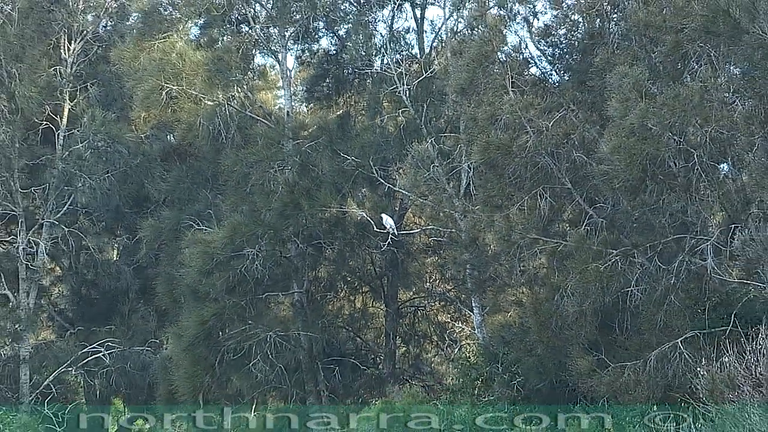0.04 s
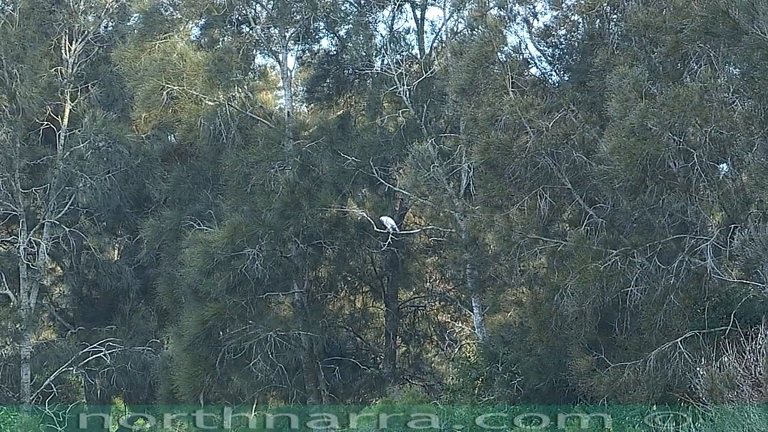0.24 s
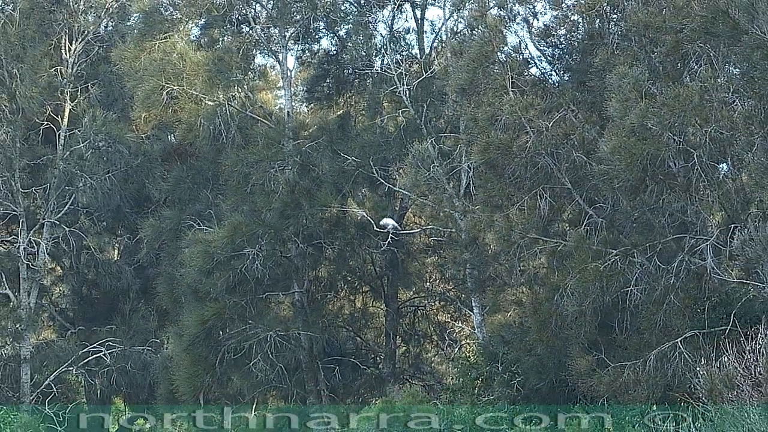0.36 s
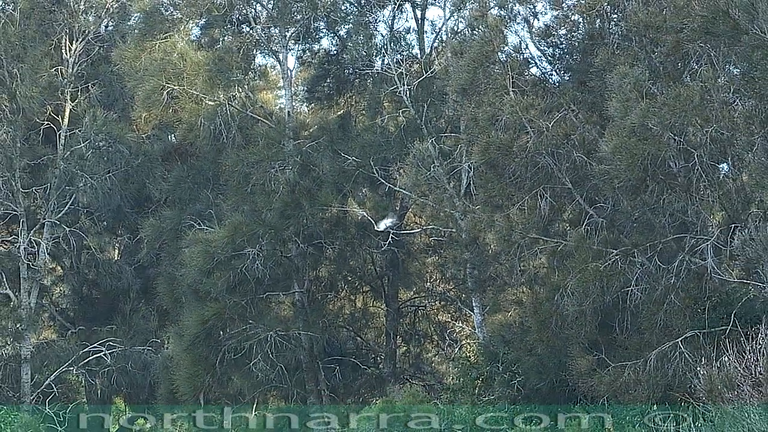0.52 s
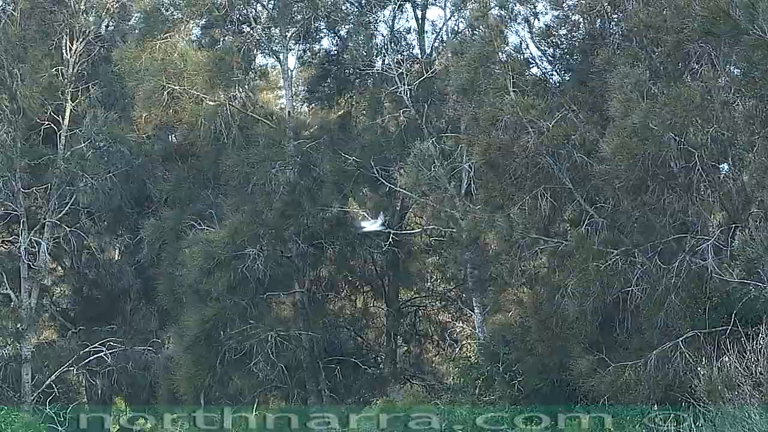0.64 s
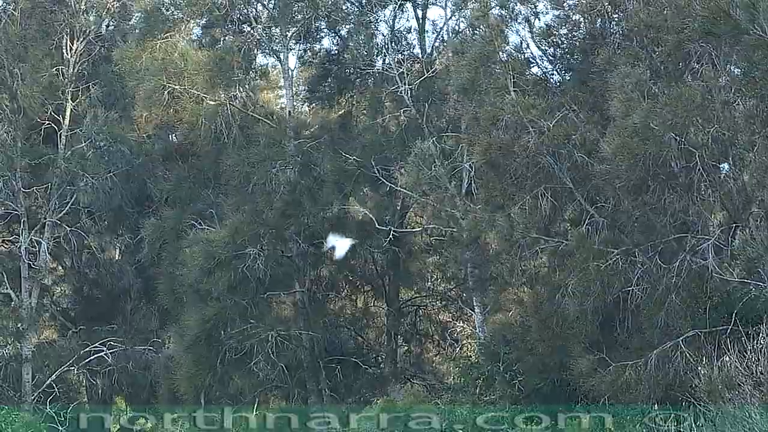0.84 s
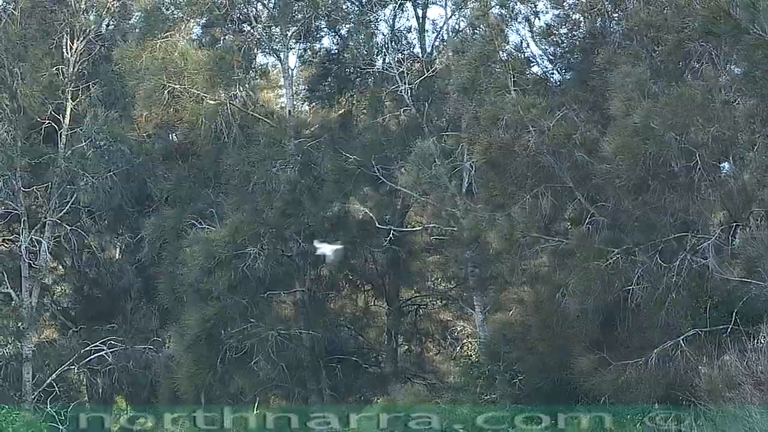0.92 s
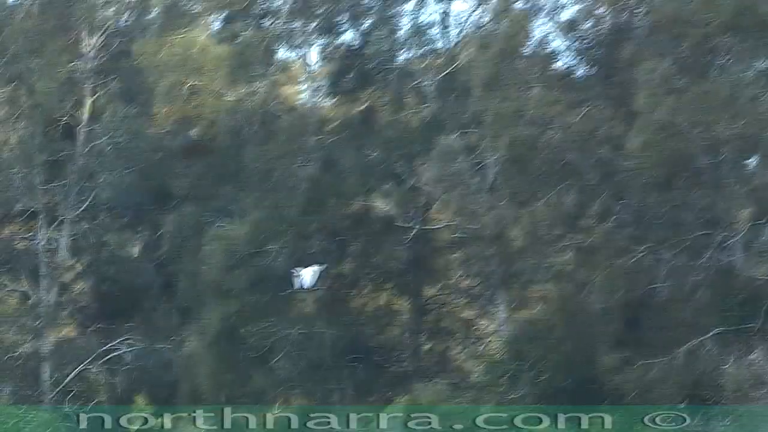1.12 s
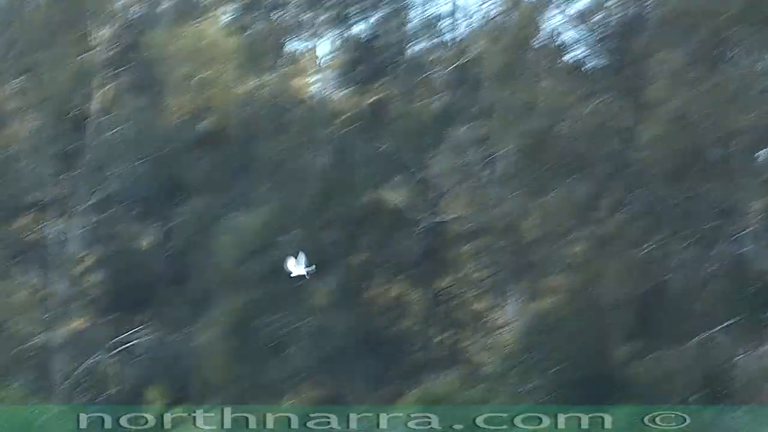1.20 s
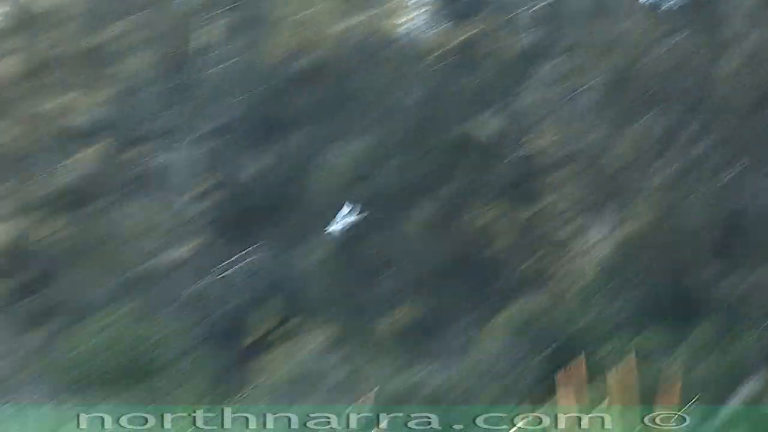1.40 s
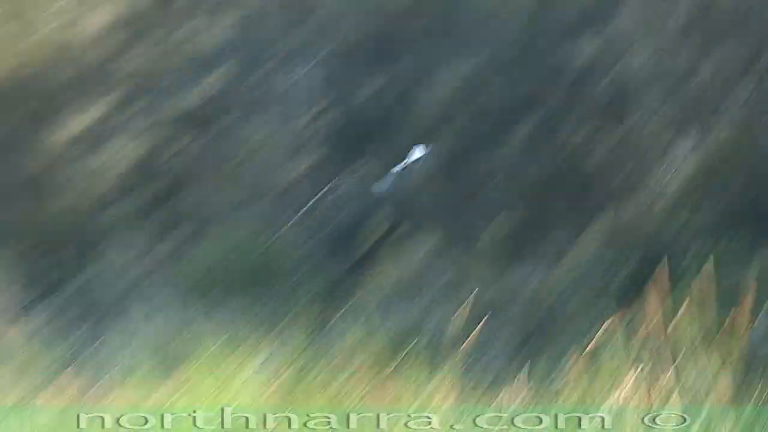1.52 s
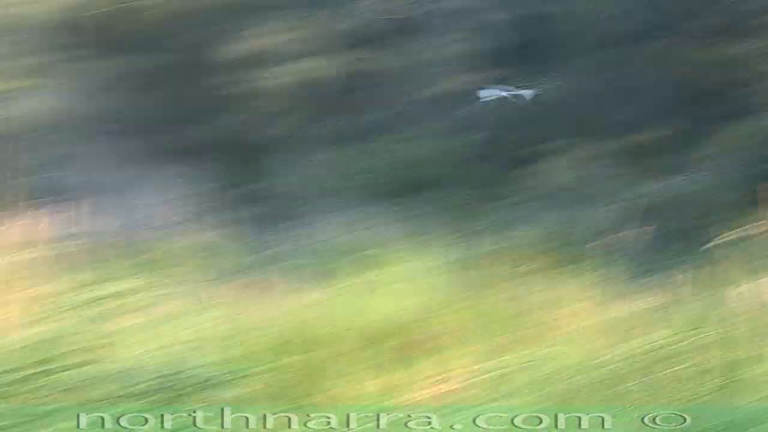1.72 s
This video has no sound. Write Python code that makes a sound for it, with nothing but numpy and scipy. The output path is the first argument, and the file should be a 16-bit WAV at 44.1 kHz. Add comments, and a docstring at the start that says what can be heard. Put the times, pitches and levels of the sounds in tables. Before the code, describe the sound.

A bird whistles two clear, swooping calls that echo lightly from the trees. A second bird then rattles dry clicks on the left, followed by small chirps. Faint insects and leaf hiss fill the woodland around the microphone.

```python
"""Birds at the edge of bushland

A bird whistles two swooping calls, nearly pure tones that scatter back from the trees.
Farther off, a second bird rattles off dry clicks, each a set of damped resonances, small birds
chirp in short glides, and insects sound one pulse of tone per wing stroke.
Beneath them lie a distant drone and rumble and a faint hiss of leaves."""
import sys
import numpy as np
from scipy import signal
from scipy.fft import rfft, irfft
from scipy.io import wavfile
from scipy.ndimage import uniform_filter1d

SR = 44100
rng = np.random.default_rng(int(sys.argv[2]) if len(sys.argv) > 2 else 0)


def int16_out(signal):
    """Quantize to a 16-bit WAV file."""
    q = np.round(np.clip(np.atleast_2d(signal).T, -1, 1) * 32767)
    wavfile.write(sys.argv[1], SR, q.astype(np.int16))


N = 77175
TIME = np.arange(N) / SR

# contours of the two whistled calls: t/s, f/Hz, level/dB
FIRST_CALL = [(.339, 1393, -47), (.349, 1481, -30), (.363, 1547, -50), (.371, 1510, -33), (.385, 1397, -39),
              (.393, 1408, -45), (.402, 1426, -32), (.411, 1540, -30), (.422, 1722, -41.5),
              (.436, 1841, -30.5), (.446, 1774, -33.5), (.456, 1582, -40), (.466, 1375, -36.5),
              (.475, 1459, -32), (.486, 1532, -29.5), (.497, 1650, -39), (.513, 1733, -36),
              (.54, 1650, -42), (.595, 1654, -47.5), (.635, 1605, -42), (.665, 1647, -45),
              (.685, 1606, -55)]
SECOND_CALL = [(0.849, 1408, -42), (.857, 1462, -38), (.866, 1486, -39.5), (.878, 1323, -49),
               (0.887, 1368, -35.5), (.901, 1426, -38), (.911, 1520, -42), (.922, 1621, -34.5),
               (.935, 1689, -34), (0.949, 1784, -41), (0.968, 1854, -36), (.99, 1767, -38.5),
               (1.008, 1644, -33.5), (1.023, 1355, -50), (1.036, 1496, -35), (1.058, 1691, -42),
               (1.09, 1692, -39), (1.15, 1636, -47.5), (1.187, 1583, -45.5), (1.209, 1516, -49),
               (1.228, 1589, -59), (1.25, 1678, -48), (1.259, 1707, -75)]
# partials of the voice, the second being the whistled pitch: harmonic number, level/dB
VOICE_HARMONICS = [(1, -21), (2, -1.5), (3, -24.5), (6, -35)]
# frequency response of the throat: f/Hz, gain/dB
THROAT_RESPONSE = [(700, 1), (900, 2.5), (1400, -0.5), (1900, 1.5), (2200, -4.5), (2480, 2), (2750, -0.5),
                   (3500, 13), (4300, 6), (4900, 3.5), (5500, -20)]
# reflections from the nearest trees: delay/s, left gain/dB, right gain/dB
TREE_ECHOES = [(.037, -17.5, -15), (.056, -13.5, -12.5), (0.089, -28, -25), (0.126, -31, -34)]
# impulses of the rattle: t/s, level/dB
CLICKS = [(1.055, -39), (1.0875, -38), (1.122, -35), (1.152, -34), (1.180, -33.5), (1.1996, -30.5),
          (1.2041, -31.5), (1.2292, -37), (1.2339, -29), (1.2643, -28.5), (1.2934, -29.5), (1.3194, -33),
          (1.3452, -31.5), (1.368, -36), (1.3883, -34), (1.424, -37)]
# resonances of a click: f/Hz, gain/dB, T60/s
CLICK_MODES = [(2820, 0.5, 0.0033), (3285, 3.5, .003), (3780, -2.5, 0.0047)]
# small birds: t/s, duration/s, start f/Hz, end f/Hz, level/dB, left over right/dB, roughness (share of f)
CHIRPS = [(0.03, 0.21, 3600, 3550, -62.5, -3, .05), (0.284, .03, 4770, 5500, -64, -6, .06),
          (.71, .035, 4550, 5360, -66, -4, .1), (1.406, 0.048, 5090, 4550, -64.5, 12, 0.0264),
          (1.438, 0.038, 4407, 3950, -60, 9.5, .025), (1.461, 0.025, 4680, 4240, -62, 14, 0.017),
          (1.482, 0.026, 4006, 4280, -57, 9, 0.023), (1.503, 0.044, 4310, 4035, -59.5, 10.5, 0.022),
          (1.545, 0.0294, 4890, 4820, -64.5, 10, 0.031), (1.452, .022, 2680, 2400, -58, 7, 0.0083),
          (1.55, .032, 2746, 2490, -56.5, 11.5, 0.0089), (1.588, 0.14, 3000, 3104, -64.5, 1, 0.0085),
          (1.689, 0.04, 2520, 2390, -63, 14, 0.0041), (1.508, 0.11, 7790, 7970, -73, 12, .03),
          (1.613, 0.087, 7330, 7220, -67.5, 12.5, .01)]
# contours of the two insect songs: t/s, f/Hz, level/dB
NEAR_INSECT = [(0, 6880, -71.5), (.36, 6730, -73), (.48, 6800, -63), (.58, 6920, -62.5), (.77, 6874, -64),
               (1.01, 6955, -63.5), (1.035, 6950, -90)]
FAR_INSECT = [(0, 6500, -70), (.6, 6440, -71), (1.1, 6296, -71), (1.75, 6200, -71)]
# tones of the distant drone: f/Hz, level/dB
DRONE_TONES = [(64.6, -59), (92, -67.5)]
# spectral density of the rumble and leaf hiss: f/Hz, relative level/dB
AIR_SPECTRUM = [(20, -32), (35, -9.5), (55, -4.5), (80, -3.5), (110, -2), (170, -5), (280, 0), (450, -4),
                (800, -8), (1200, -9.5), (2000, -16), (3300, -17.5), (5200, -26.5), (6300, -22),
                (8200, -33.5), (11000, -34.5), (15500, -37)]
# likeness of that noise at the two ears: f/Hz, correlation
AIR_CORRELATION = [(50, 0.91), (150, 0.76), (400, 0.69), (900, 0.49), (2500, 0.1), (6000, 0.067),
                   (13000, 0.043)]


def whistler():
    """Source and filter: the throat weights the harmonics of a whistle, which the trees then reflect."""
    voice = 0
    for call in (FIRST_CALL, SECOND_CALL):
        hz, gain = contour(call)
        fundamental = hz / 2 * (1 + .003 * drift(90))
        flutter = from_db(.5 * drift(95))
        partials = sum(from_db(db + at_hz(THROAT_RESPONSE, k * fundamental)) * tone(k * fundamental)
                       for k, db in VOICE_HARMONICS)
        voice = voice + gain * flutter * partials
    direct = left_late(voice, lag_s=.00005)
    scattered = from_db(-7.5) * bush(voice, t60=1.0)
    trees = sum(from_db([[left], [right]]) * delay(voice, s) for s, left, right in TREE_ECHOES)
    far_side = from_db(-21.5) * bush(delay(voice, lag_s=.32), t60=2.0)  # from across the clearing
    return pan(db=-5.5) * (direct + scattered) + trees + far_side


def rattling_bird():
    """Impulse response: each click, heard on the left, excites three heavily damped resonances."""
    s, db = np.transpose(CLICKS)
    clicks = 0
    for k, (hz, mode_db, t60) in enumerate(CLICK_MODES):
        impulses = np.zeros(N)
        impulses[(s * SR).astype(int)] = from_db(db + mode_db)
        radius = np.exp(-np.log(1000) / (t60 * SR))
        angle = 2 * np.pi * hz / SR
        feedback = [1, -2 * radius * np.cos(angle), radius ** 2]
        ringing = signal.lfilter([0, np.sin(angle)], feedback, impulses + 1e-18)
        clicks = clicks + (-1) ** k * ringing
    clicks = signal.sosfilt(signal.butter(2, [2300, 4400], "band", fs=SR, output="sos"), clicks)
    clicks = clicks + from_db(-11.5) * delay(clicks, lag_s=.0032)  # reflection from a nearby branch
    direct = pan(db=9.5) * left_late(clicks, lag_s=-.000095)
    return direct + pan(db=5.5) * from_db(-.5) * bush(clicks, t60=.33)


def small_birds():
    """Frequency modulation: fast random changes of pitch turn short, clear glides raspy."""
    chirps = 0
    for start, length, from_hz, to_hz, db, pan_db, roughness in CHIRPS:
        age = np.clip((TIME - start) / length, 0, 1)
        glide_hz = from_hz + (to_hz - from_hz) * age
        waver = 1 + .007 * drift(40.3) + roughness * drift(418)
        swell = np.sin(np.pi / 2 * np.interp(age, [0, .2, 1], [0, 1, 0]))  # quick rise, slower fade
        chirps = chirps + pan(pan_db) * from_db(db) * swell * tone(glide_hz * waver)
    return chirps + from_db(-4) * bush(chirps.mean(axis=0), t60=.38)


def insect(rows, strokes_per_s, first_s, sag_hz, echo_db):
    """Amplitude modulation: each wing stroke is a pulse of tone that holds, then drops in pitch."""
    hz, gain = contour(rows)
    stroke = ((TIME - first_s) * strokes_per_s) % 1
    hz = (hz - sag_hz * stroke ** 5.5) * (1 + .00825 * drift(257))
    pulses = rms_one(np.abs(np.sin(np.pi * stroke)) ** 1.14)
    song = gain * pulses * (tone(hz) + from_db(-18) * tone(2 * hz))
    return song + from_db(echo_db) * bush(song, t60=.2)


def drone(swell_db=2.5, wander_hz=3):
    """Slow random modulation: two low, distant tones waver in level and pitch."""
    return sum(from_db(db + swell_db * drift(7)) * tone(hz + wander_hz * drift(7.7))
               for hz, db in DRONE_TONES)


def air(level_db=-49, flicker_db=1.0):
    """Partial coherence: far rumble is alike at both ears, while leaf hiss differs and sounds wide."""
    hz = np.maximum(np.arange(N // 2 + 1) * SR / N, 1)
    alike = np.clip(at_hz(AIR_CORRELATION, hz), 0, 1)
    mid, side = rfft(rng.standard_normal((2, N))) * from_db(at_hz(AIR_SPECTRUM, hz))
    spectra = np.sqrt(1 + alike) * mid + np.sqrt(1 - alike) * side * [[1], [-1]]
    octave = np.floor(np.log2(hz))
    bands = sum(irfft(spectra * (octave == k), N) * from_db(flicker_db * drift(11.5))
                for k in np.unique(octave[hz > 16]))
    return from_db(level_db) * rms_one(bands)


def bush(x, t60, build_s=.03):
    """Diffuse scattering: trunks and foliage return countless faint echoes, different at each ear."""
    envelope = from_db(-60 * TIME / t60) * (1 - np.exp(-TIME / build_s))
    echoes = rng.standard_normal((2, N)) * envelope
    echoes /= np.sqrt(np.sum(echoes ** 2, axis=1, keepdims=True))
    return signal.fftconvolve(x[None], echoes, axes=1)[:, :N]


def contour(rows):
    """Interpolation: smooth pitch and gain through rows of t, f and level, silent outside them."""
    s, hz, db = np.transpose(rows)
    gain = from_db(np.interp(TIME, s, db)) * (TIME >= s[0]) * (TIME <= s[-1])
    return uniform_filter1d(np.interp(TIME, s, hz), size=260), uniform_filter1d(gain, size=130)


def tone(hz):
    """Phase is the integral of frequency: a sine of rms 1 follows a pitch curve."""
    return np.sqrt(2) * np.sin(2 * np.pi * np.cumsum(hz) / SR + rng.uniform(0, 2 * np.pi))


def drift(corner_hz):
    """Low-pass filtered noise: random motion of rms 1."""
    step, settle = 40, 2000
    pole = np.exp(-2 * np.pi * corner_hz * step / SR)
    noise = rng.standard_normal(N // step + settle + 2)
    slow = signal.lfilter([1], [1, -2 * pole, pole ** 2], noise)[settle:]
    return np.interp(np.arange(N) / step, np.arange(len(slow)), rms_one(slow))


def delay(x, lag_s):
    """Travel time shifts a signal."""
    return np.interp(TIME - lag_s, TIME, x, left=0)


def left_late(x, lag_s):
    """Interaural time difference: a positive lag reaches the left ear later."""
    return np.array([delay(x, lag_s), x])


def pan(db):
    """Interaural level difference: a pair of gains, left over right."""
    return from_db(np.array([[db], [-db]]) / 2)


def at_hz(points, hz):
    """Interpolation on a log-frequency axis."""
    f, value = np.transpose(points)
    return np.interp(np.log(hz), np.log(f), value)


def from_db(db):
    """Level to amplitude ratio."""
    return 10 ** (np.asarray(db) / 20)


def rms_one(x):
    """Normalisation to unit rms."""
    return x / np.sqrt(np.mean(x ** 2) + 1e-20)


def scene():
    """Superposition: birds, insects and background add at each ear."""
    insects = (insect(NEAR_INSECT, strokes_per_s=54.2, first_s=.021, sag_hz=1000, echo_db=-13)
               + insect(FAR_INSECT, strokes_per_s=49.3, first_s=.005, sag_hz=1020, echo_db=-1.5))
    return whistler() + rattling_bird() + small_birds() + insects + drone() + air()


def record(dry):
    """Band limiting: a steep low-pass filter cuts the treble above 15.8 kHz."""
    return signal.sosfilt(signal.ellip(12, .1, 80, 15800, fs=SR, output="sos"), dry)


dry = scene()
out = record(dry)
int16_out(out)
```